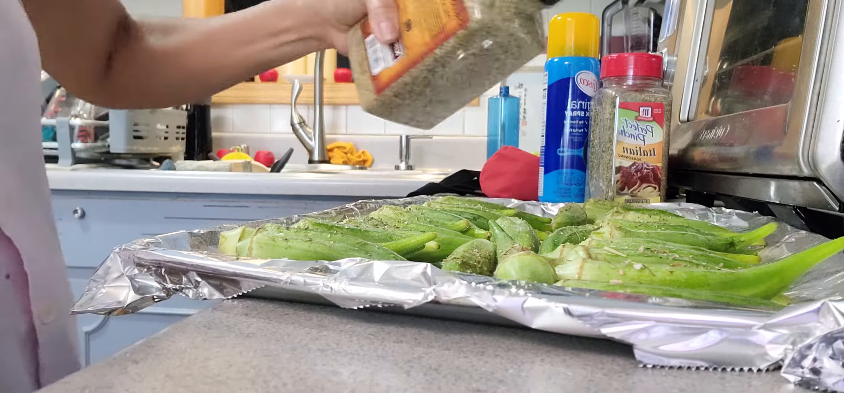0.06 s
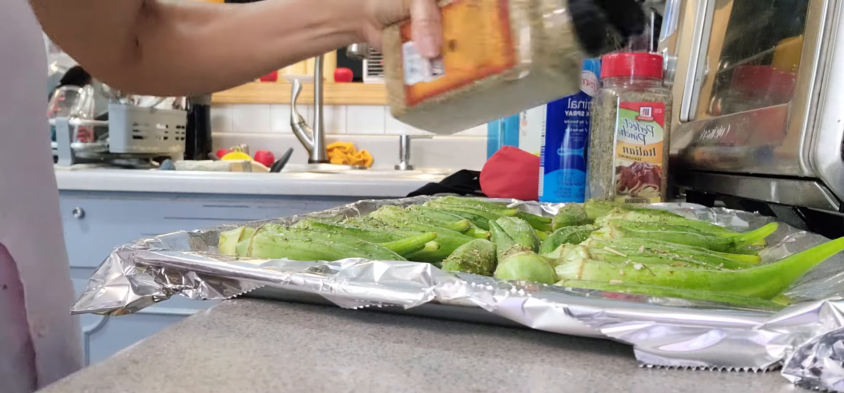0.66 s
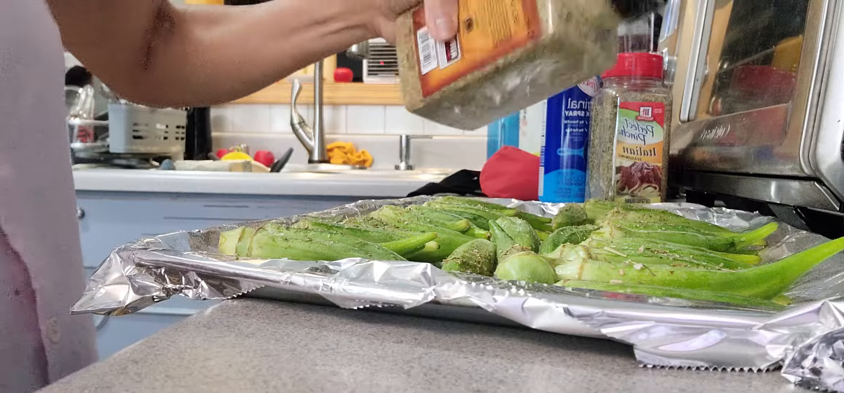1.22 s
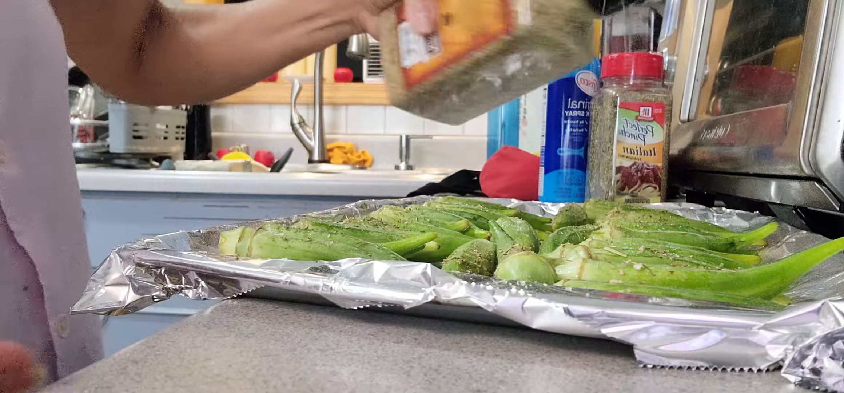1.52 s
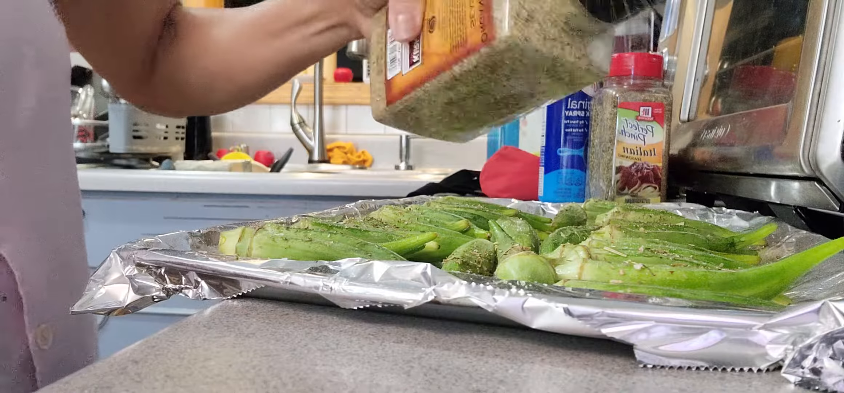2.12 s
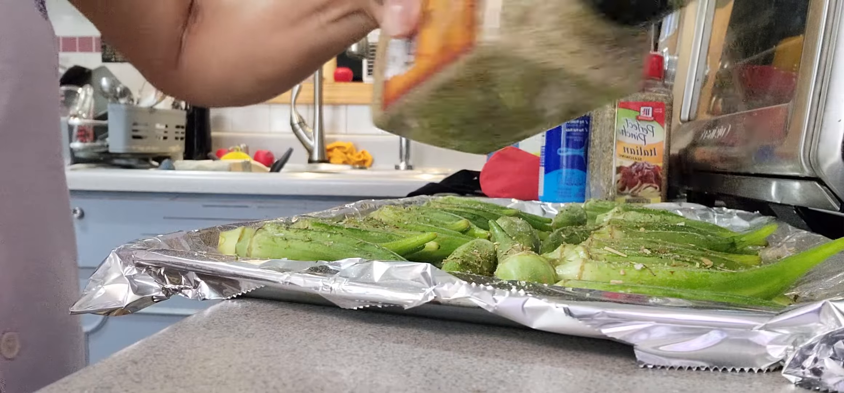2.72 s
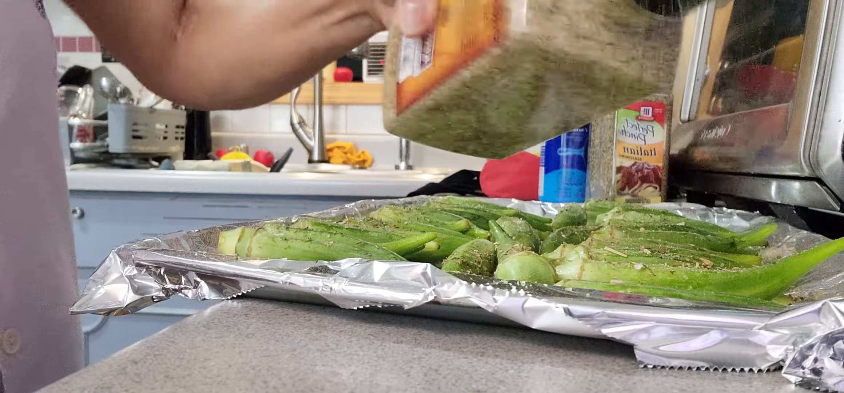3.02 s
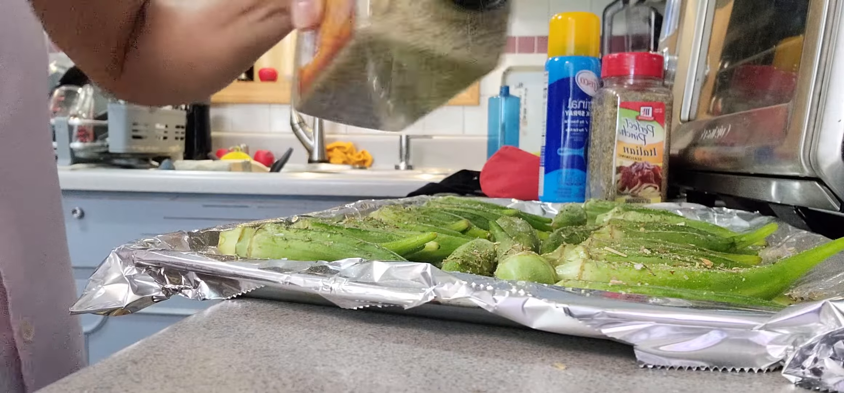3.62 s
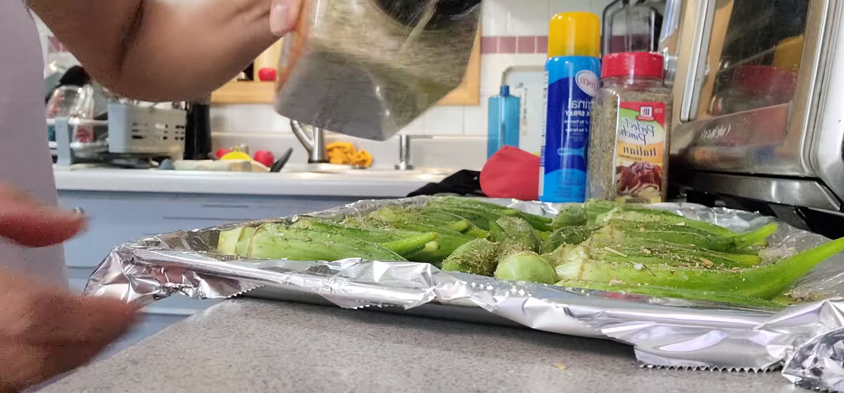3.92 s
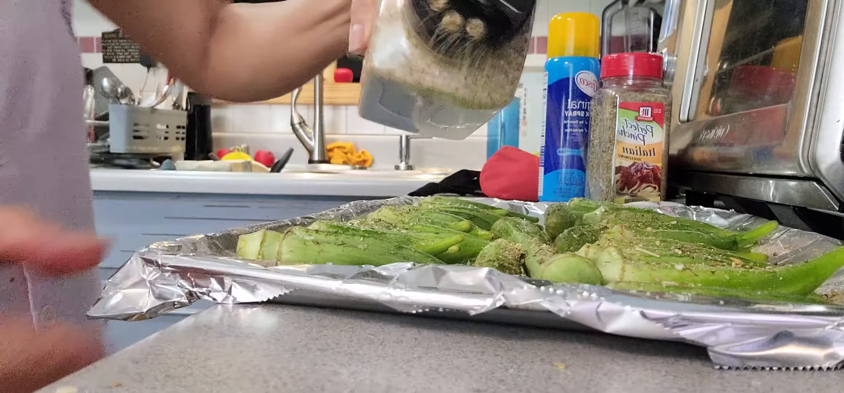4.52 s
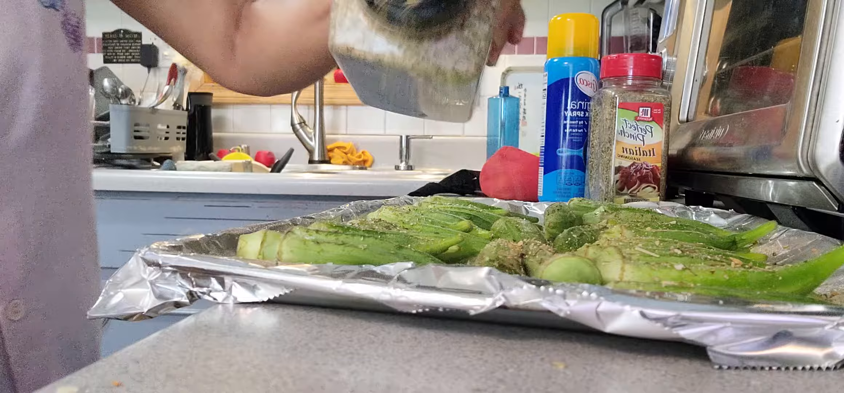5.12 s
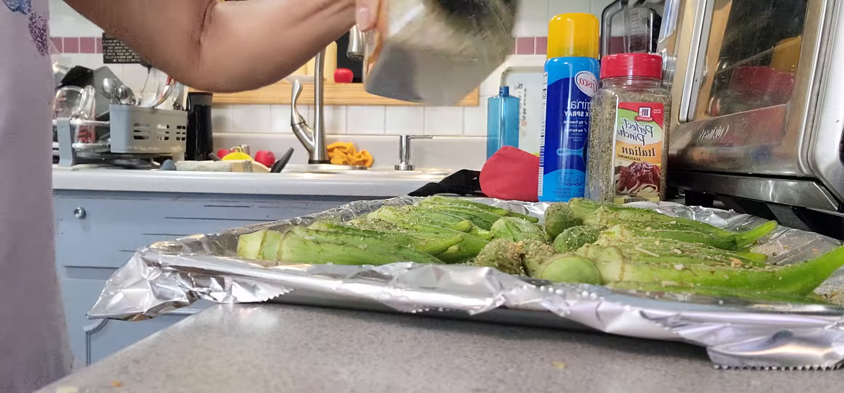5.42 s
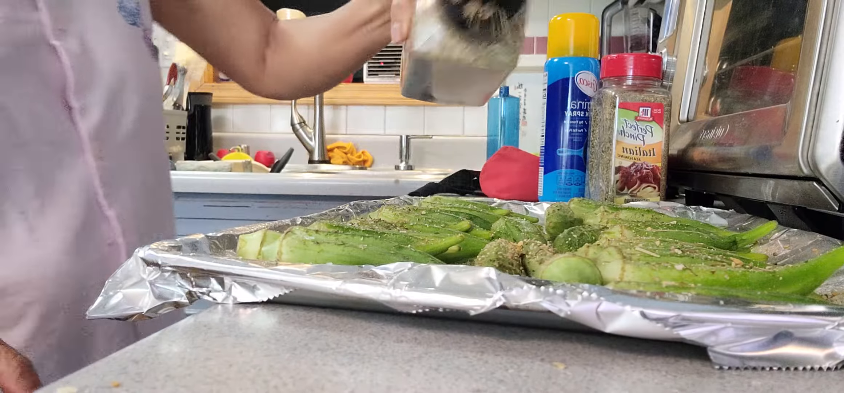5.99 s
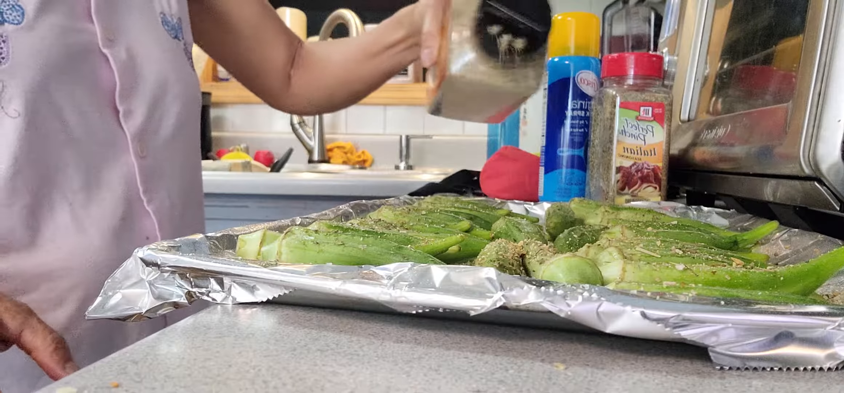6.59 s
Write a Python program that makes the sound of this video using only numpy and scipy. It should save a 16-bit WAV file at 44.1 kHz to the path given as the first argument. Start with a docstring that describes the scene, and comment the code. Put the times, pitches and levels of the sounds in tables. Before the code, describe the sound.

A faint hiss of fine dust leads into a run of dry, crisp shakes of seasoning in a plastic jar, loose grains ticking on a foil-lined tray near the microphone. Midway the shaking pauses, foil snaps and rustles, and the tray scrapes to a small knock. Then the jar rattles again, more sparsely, over the steady low hum of kitchen appliances.

```python
"""A kitchen counter, close up, heard through the two microphone ports of a camera; appliances hum behind.
Dried seasoning is shaken from a big plastic jar over vegetables on a foil-lined tray. Dust hisses out
first; each shake throws grains against the jar and its lid, while loose ones patter down on the foil.
Midway a hand grips the crackling foil and drags the tray to a knock, then the shaking resumes."""
import sys
import numpy as np
from scipy import signal
from scipy.fft import rfft, irfft
from scipy.io import wavfile
from scipy.ndimage import uniform_filter1d

SR = 44100
rng = np.random.default_rng(int(sys.argv[2]) if len(sys.argv) > 2 else 0)


def unload_wav(signal):
    """Save mono or channel-first audio to the path in sys.argv[1] as 16-bit WAV at rate SR, clipped to [-1, 1]."""
    wavfile.write(
        sys.argv[1],
        SR,
        np.round(np.clip(np.atleast_2d(signal).T, -1, 1) * 32767).astype(np.int16),
    )


N = 297675
TIME = np.arange(N) / SR


def amp(db):
    """Decibels to gain."""
    return 10 ** (np.asarray(db) / 20)


def unit(x):
    """Scales to an rms of one."""
    return x / np.sqrt(np.mean(x ** 2) + 1e-20)


def curve(points, hz):
    """Joins (freq_hz, value) points on a log-frequency axis."""
    freqs, values = np.transpose(points)
    return np.interp(np.log(hz + 1), np.log(freqs + 1), values)


def humps(rings, hz):
    """Rounded resonance peaks from rows of (pitch_hz, width_hz, height)."""
    return sum(height / (1 + (2 * (hz - pitch) / width) ** 2) for pitch, width, height in rings)


def held(start_s, stop_s, edge_s):
    """Gain that fades in, holds and fades out."""
    return np.clip(np.minimum(TIME - start_s, stop_s - TIME) / edge_s, 0, 1)


def add(mix, start_s, sound):
    """Mixes a stereo sound in."""
    part = mix[:, max(round(start_s * SR), 0):][:, :sound.shape[1]]
    part += sound[:, :part.shape[1]]


# Air resonances of the jar: pitch_hz, width_hz, share_of_body
JAR_AIR = [(1430, 170, 0.96), (1750, 430, 1.97), (2280, 290, 0.33), (3360, 570, 0.78)]

def impact(colour, rings, body_db, fizz_db, patchy_db, size=2048):
    """One tiny impact: a causal pulse, coloured a little differently at every spot."""
    hz = np.fft.rfftfreq(size, 1 / SR)
    db = curve(colour, hz) + humps(rings, hz) + body_db * humps(JAR_AIR, hz)
    db += fizz_db * curve([(7000, 0.33), (10500, 0.67)], hz)
    db += patchy_db * unit(uniform_filter1d(rng.standard_normal(len(hz)), size=32))
    log_gain = np.log(amp(np.r_[db, db[-2:0:-1]]))
    minimum_phase = np.exp(np.conj(signal.hilbert(log_gain)))
    return np.fft.ifft(minimum_phase).real[:size // 2]


def random_hits(count, per_s, spread_db):
    """Randomly timed impulses, most of them small and a few large."""
    strength = amp(spread_db * np.minimum(rng.exponential(1, count), 4))
    return strength * rng.choice([-1., 1.], count) * (rng.random(count) < per_s / SR)


def at_microphone(pulse, echo_db=-1.5, size=512):
    """A close spot as the two ports hear it, with its own lag and echoes off counter and oven door."""
    t = np.arange(size) / SR
    echoes = rng.standard_normal((2, size)) * np.exp(-t / 0.0034) * (t > .0006)
    paths = amp(echo_db) * echoes / np.linalg.norm(echoes, axis=1, keepdims=True)
    lag_s = .00013 + .00012 * rng.standard_normal()  # mostly the right port comes first
    paths[0, round(np.clip(lag_s, 0, t[-1]) * SR)] += 1
    paths[1, round(np.clip(-lag_s, 0, t[-1]) * SR)] += 1
    heard = signal.fftconvolve(pulse[None], paths, axes=1) * amp([[-1.5], [1.5]])
    return heard / np.linalg.norm(heard)


def add_burst(mix, peak_s, level_db, fall_s, pulse, snap_s, per_s, spread_db=2, echo_db=-2.5):
    """A crowd of impacts swells and thins out; the shorter it is, the more of it is one hard snap."""
    rise_s = .0006 + .13 * fall_s
    t = np.arange(-int(2 * rise_s * SR), int(5 * fall_s * SR)) / SR
    swell = np.exp(np.minimum(2 * t / rise_s, -t / fall_s))
    density = per_s * (1 + .015 / fall_s * swell)  # a short burst packs its impacts closer
    crowd = swell * random_hits(len(t), density, spread_db)
    crowd /= np.linalg.norm(crowd) + 1e-12
    snap_share = np.exp(-fall_s / snap_s)
    hits = np.sqrt(1 - snap_share) * crowd + np.sqrt(snap_share) * (t == 0)
    sound = signal.fftconvolve(hits[None], at_microphone(pulse, echo_db), axes=1)
    add(mix, peak_s - rise_s, amp(level_db) * np.linalg.norm(swell) * sound / np.linalg.norm(sound))


def stream(colour, rings, per_s, spread_db, spurt_db, patchy_db, span_s=(0, np.inf), size=1024):
    """A run of impacts that comes in spurts and lands on a new spot from moment to moment."""
    active = (TIME >= span_s[0]) & (TIME <= span_s[1])
    spurts = unit(uniform_filter1d(uniform_filter1d(rng.standard_normal(N), size=700), size=200))
    hits = active * random_hits(N, per_s, spread_db) * amp(spurt_db * np.clip(spurts, -2, 2))
    out = np.zeros((2, N))
    for start in range(0, N, size):
        if active[start:start + size].any():
            spot = at_microphone(impact(colour, rings, 0, 0, patchy_db))
            add(out, start / SR, signal.fftconvolve(hits[None, start:start + size], spot, axes=1))
    return unit(out) * np.sqrt(active.mean())


# Room tone behind the counter: freq_hz, gain_db
ROOM_COLOUR = [(20, -9), (38, -1), (52, -4), (75, 1), (115, -8), (170, -15), (250, -14), (450, -18),
               (780, -23), (1100, -32), (1600, -34), (2500, -42), (7000, -42.5), (9500, -47), (16000, -50)]
# How alike it is at the two ports: freq_hz, correlation
ROOM_LIKENESS = [(60, 1), (130, 0.75), (300, 0.76), (640, 0.52), (1400, 0), (3000, 0)]
# An appliance in the background: pitch_hz, level_db
HUM_TONES = [(242.2, -72.5), (409.1, -65.5), (543.7, -76.5)]

def kitchen_hum(room_db=-55):
    """Low rumble and fan noise with an appliance's wavering tones, a little louder on the right."""
    hz = np.fft.rfftfreq(N, 1 / SR)
    left, other = rfft(rng.standard_normal((2, N)))
    likeness = np.clip(curve(ROOM_LIKENESS, hz), -1, 1)
    right = likeness * left + np.sqrt(1 - likeness ** 2) * other
    air = unit(irfft(np.array([left, right]) * amp(curve(ROOM_COLOUR, hz)), N))
    hum = np.zeros(N)
    for pitch_hz, level_db in HUM_TONES:
        waver_hz = 1.46 * unit(uniform_filter1d(rng.standard_normal(N), size=6000))
        hum += amp(level_db) * np.sqrt(2) * np.sin(2 * np.pi * np.cumsum(pitch_hz + waver_hz) / SR)
    return (amp(room_db) * air + hum) * amp([[-1.1], [1.1]])


# Fine dust, faint even this close: freq_hz, gain_db
DUST_COLOUR = [(2500, -35), (5500, -10), (7000, 2.5), (9000, -7), (16000, -15)]

def dust_hiss(span_s=(0.312, 0.56)):
    """Fine dust hisses out as the jar tips."""
    hiss = stream(DUST_COLOUR, (), per_s=5700, spread_db=2.5, spurt_db=4.5, patchy_db=0.5, span_s=span_s)
    return amp(-62.5) * held(*span_s, edge_s=0.0056) * hiss


# Grains thrown against the jar, close to the microphone: peak_s, relative_db, fall_s, dust_fizz_db
SHAKES = [(0.5397, -36.5, .012, 0), (0.5514, -28, .035, 0), (0.5634, -29, 0.017, 4),
          (0.645, -29.5, 0.0059, -11), (0.718, -33.5, 0.015, 8), (0.7304, -28.5, 0.019, 7),
          (0.827, -40.5, 0.021, -10), (0.862, -37.5, 0.0095, -1), (0.969, -43, 0.0079, -9),
          (1.019, -46.5, 0.012, -1), (1.131, -46, .018, 9), (1.2135, -38, .007, -14),
          (1.266, -44.5, .025, 3), (1.2952, -26.5, .0064, 3), (1.4195, -36, 0.016, 2),
          (1.4838, -29, .012, 10), (1.534, -33, 0.0093, -18), (1.639, -43.5, 0.026, -6),
          (1.707, -35.5, 0.0085, 11), (1.918, -30, 0.0081, -13), (1.9732, -30.5, 0.025, 10),
          (2.0583, -30.5, .013, -9), (2.161, -21.5, .005, 11), (2.178, -32.5, 0.018, 5),
          (2.22, -37, 0.013, 6), (2.253, -32.5, 0.0088, 3), (2.3064, -38, 0.022, -2),
          (2.395, -37, 0.016, 0), (2.4153, -34, 0.0088, 1), (2.5099, -29, 0.011, 20),
          (2.5172, -20.5, 0.0098, 11), (2.6003, -20, .011, 0), (2.63, -30, .014, -8),
          (2.66, -31.5, .018, -16), (2.6885, -21, 0.013, -6), (2.829, -30, 0.0045, -3),
          (2.863, -27, .022, -2), (2.992, -25, .0076, -2), (3.013, -27, 0.0067, 7), (3.044, -31, 0.021, 4),
          (3.058, -27.5, 0.0045, -4), (3.0809, -25, 0.013, 8), (3.111, -21.5, 0.0067, 12),
          (3.1219, -20, 0.0026, 14.5), (3.2377, -21, 0.004, 4), (5.096, -27.5, 0.014, -1),
          (5.11, -24, 0.0058, -10), (5.167, -36, 0.0071, 2), (5.2439, -33, 0.0082, -8),
          (5.2644, -32, 0.0056, -2), (5.4547, -43.5, 0.0049, 33), (5.61, -45, 0.025, 24),
          (5.8261, -41, 0.012, 15), (6.225, -34.5, 0.007, -9), (6.2606, -35, 0.016, -6),
          (6.317, -37, 0.042, -7), (6.4057, -29.5, 0.032, 5), (6.662, -36.5, 0.013, -12),
          (6.6976, -34, 0.02, -7), (6.7173, -28.5, 0.0055, -10)]
# A grain's strike: freq_hz, gain_db
STRIKE_COLOUR = [(200, -29), (600, -28), (880, -21.5), (1150, -27.5), (1900, -17), (2600, -9), (4000, -1),
                 (5500, 0.5), (6900, 0), (8200, -6), (9700, -12.5), (11500, -7.5), (16000, -15)]
# Resonances of the plastic jar, and of its mouth: pitch_hz, width_hz, height_db
JAR_RINGS = [(2060, 83, -1.5), (3930, 160, -2.5), (6990, 250, 4), (8520, 150, 4), (9020, 47, 9.5)]
MOUTH_RING = [(3250, 750, 6.8)]
# The jar's hollow body, strongest when the whole heap slides: time_s, body_db
HOLLOWNESS = [(0.54, 9), (0.6, 12), (0.85, 7.5), (0.98, 18.5), (1.15, 1), (1.6, 7.5), (2.15, -3), (2.7, 2),
              (5.2, 0), (6.3, -3), (6.72, 5)]

def jar_shakes(turn_s=6.15):
    """Seasoning strikes the jar; after turn_s its mouth faces the microphone and rings through."""
    out = np.zeros((2, N))
    for peak_s, level_db, fall_s, fizz_db in SHAKES:
        body_db = np.interp(peak_s, *np.transpose(HOLLOWNESS))
        rings = JAR_RINGS + MOUTH_RING if peak_s > turn_s else JAR_RINGS
        pulse = impact(STRIKE_COLOUR, rings, body_db, fizz_db, patchy_db=1.7)
        add_burst(out, peak_s, level_db, fall_s, pulse, snap_s=0.0021, per_s=1500)
    return amp(3.5) * out


# Steady flow with the tilt of the jar: time_s, relative_db
POUR = [(0, -89), (0.28, -76.5), (0.53, -77), (0.6, -57), (1.1, -60.5), (2.4, -55), (2.68, -47),
        (2.95, -58.5), (3.3, -60), (3.55, -61.5), (3.76, -65), (4.6, -59), (5.2, -58), (5.45, -62),
        (6.1, -59), (6.75, -55)]

def grain_flow(pour_db, stirred_db, delay_s, lead_s=0.0045, settle_s=0.034):
    """Gain of the loose grains: the pour, plus a heap that slides just before each shake and settles."""
    kicks = np.zeros(N)
    for peak_s, level_db, fall_s, _ in SHAKES:
        kicks[min(round((peak_s + delay_s) * SR), N - 1)] += amp(level_db) ** 2 * fall_s / 2
    after = signal.lfilter([1 / settle_s], [1, -np.exp(-1 / (settle_s * SR))], kicks)
    before = signal.lfilter([1 / lead_s], [1, -np.exp(-1 / (lead_s * SR))], kicks[::-1])[::-1]
    pour = amp(np.interp(TIME, *np.transpose(POUR)) + pour_db)
    return np.sqrt(pour ** 2 + amp(stirred_db) ** 2 * (after + 0.53 * before))


def jar_slide():
    """Loose seasoning keeps sliding along the plastic between shakes."""
    sliding = stream(STRIKE_COLOUR, JAR_RINGS, per_s=900, spread_db=3, spurt_db=4.5, patchy_db=3)
    return amp(2.5) * grain_flow(pour_db=0, stirred_db=-13, delay_s=0) * sliding


# Fine grains landing on the tray nearby: freq_hz, gain_db
PATTER_COLOUR = [(500, -44), (1500, -4.5), (3000, 1), (6500, -7.5), (9500, -0.5), (12000, 2), (16000, 0)]

def grain_patter():
    """Fine grains drop on foil and vegetables, loudest just after each shake."""
    landing = stream(PATTER_COLOUR, (), per_s=1200, spread_db=3, spurt_db=6.5, patchy_db=0.5)
    return amp(3) * grain_flow(pour_db=-1.5, stirred_db=-25, delay_s=0.01) * landing


# Coarse grains landing nearby: peak_s, relative_db
TICKS = [(1.8754, -30.5), (2.7819, -14.5), (3.859, -33.5), (4.6565, -33), (5.0477, -32), (5.7069, -31.5),
         (5.874, -22.5), (5.9783, -28.5), (6.0604, -34.5), (6.339, -26)]
# The foil under a grain: pitch_hz, width_hz, height_db
TICK_RING = [(5800, 710, 10)]

def coarse_ticks():
    """Coarse grains tick singly and make the foil ring."""
    out = np.zeros((2, N))
    for peak_s, level_db in TICKS:
        pulse = impact(STRIKE_COLOUR, TICK_RING, body_db=-0.5, fizz_db=-2, patchy_db=2.4)
        add_burst(out, peak_s, level_db, fall_s=0.0035, pulse=pulse, snap_s=0.0022, per_s=2000)
    return amp(-1) * out


# Creases snapping under the hand, close up: peak_s, relative_db, pitch_hz, fall_s
FOIL_SNAPS = [(3.979, -24.5, 5730, 0.0032), (4.032, -33, 5330, 0.0026), (4.0733, -16, 5400, 0.003),
              (4.146, -26, 4900, 0.003), (4.1889, -21, 3300, 0.0031), (4.2173, -23, 5630, 0.0026),
              (4.3595, -21, 3430, 0.0027), (4.3852, -17.5, 5070, 0.003), (4.4128, -9, 4200, 0.003),
              (4.4609, -6.5, 5130, 0.003), (4.4654, -7.5, 7240, 0.003)]
# Crumpling foil: freq_hz, gain_db
FOIL_COLOUR = [(200, -25), (400, -14.5), (800, -18.5), (1500, -19), (2500, -3.5), (4300, 0.5), (7000, 1.5),
               (9700, -14.5), (12000, -14.5), (16000, -19)]

def foil_crackle(grip_s=(3.975, 4.5)):
    """The foil rim rustles in the hand, and each crease that snaps rings at its own pitch."""
    snaps = np.zeros((2, N))
    for peak_s, level_db, pitch_hz, fall_s in FOIL_SNAPS:
        fizz_db = 8.5 + 1.3 * (level_db + 14.5)  # harder snaps are brighter
        ring = [(pitch_hz, 1000, 11)]  # pitch_hz, width_hz, height_db
        pulse = impact(FOIL_COLOUR, ring, body_db=-3.5, fizz_db=fizz_db, patchy_db=2.6)
        add_burst(snaps, peak_s, level_db, fall_s, pulse,
                  snap_s=0.0046, per_s=4000, spread_db=1, echo_db=-5.5)
    rustle = stream(FOIL_COLOUR, (), per_s=1000, spread_db=2.5, spurt_db=5, patchy_db=3, span_s=grip_s)
    return amp(-1.2) * snaps + amp(-44.5) * held(*grip_s, edge_s=0.012) * rustle


# Tray on counter, close up: freq_hz, gain_db
SCRAPE_COLOUR = [(100, -32), (350, -8), (550, -16.5), (720, -7.5), (950, -14), (1250, -18), (1750, 2.5),
                 (2200, 0), (3500, -1.5), (6500, 2.5), (8000, -7), (9700, -15.5), (16000, -16)]
# Resonances of the dragged tray: pitch_hz, width_hz, height_db
TRAY_RINGS = [(1479, 120, 3.8), (1880, 120, 5), (3250, 230, 8.2), (4000, 150, 4.6)]

def tray_drag(pull_s=(4.17, 4.47), fastest_s=4.32, rise_db_per_s=140, fall_db_per_s=73):
    """The tray grates over the counter in one pull, louder with speed."""
    pull_db = -29 - np.maximum(rise_db_per_s * (fastest_s - TIME), fall_db_per_s * (TIME - fastest_s))
    grating = stream(SCRAPE_COLOUR, TRAY_RINGS,
                     per_s=2800, spread_db=3, spurt_db=-0.5, patchy_db=1, span_s=pull_s)
    return held(*pull_s, edge_s=0.08) * amp(pull_db) * grating


# Modes of the knocked tray, alike at both ports: pitch_hz, relative_db, t60_s
KNOCK_MODES = [(353, 3.5, 0.059), (834, -2, 0.067), (1077, -2.5, 0.065)]

def tray_knock(start_s=4.464):
    """The tray knocks as it stops and rings briefly."""
    t = np.maximum(TIME - start_s, 0)
    modes = [amp(db - 60 * t / t60_s) * np.sin(2 * np.pi * hz * t) for hz, db, t60_s in KNOCK_MODES]
    return amp(-48) * sum(modes)


def wall_echoes(near, delay_s=0.006, t60_s=0.21, wet_db=-8.5, per_s=4000, size=16384):
    """Sparse reflections off the kitchen walls, different at each port, the treble dying first."""
    taps = rng.choice([-1., 1.], (2, size)) * (rng.random((2, size)) < per_s / SR)
    hz, t, spectra = signal.stft(taps, SR, nperseg=128)
    band_t60_s = t60_s * curve([(1000, 1), (6000, 0.46), (16000, 0.24)], hz)[:, None]
    tail = signal.istft(spectra * amp(-60 * t / band_t60_s), SR, nperseg=128)[1]
    tail /= np.linalg.norm(tail, axis=1, keepdims=True)
    tail = np.pad(tail, ((0, 0), (int(delay_s * SR), 0)))
    return amp(wet_db) * signal.oaconvolve(near, tail, axes=1)[:, :N]


def scene():
    """Jar and tray close to the microphone, the walls answering faintly, room tone behind."""
    seasoning = jar_shakes() + jar_slide() + dust_hiss() + grain_patter() + coarse_ticks()
    near = seasoning + foil_crackle() + tray_drag() + tray_knock()
    return near + wall_echoes(near) + kitchen_hum()


# Lift of the left microphone port: freq_hz, gain_db
LEFT_PORT = [(600, 0), (2000, 3), (4200, 0)]

def record(dry):
    """The camera's left port favours the upper middle, and both channels roll off at 16.1 kHz."""
    hz = np.fft.rfftfreq(N, 1 / SR)
    left = irfft(rfft(dry[0]) * amp(curve(LEFT_PORT, hz)), N)
    low_pass = signal.firwin(401, 16100, window=("kaiser", 8), fs=SR)
    return signal.oaconvolve(np.array([left, dry[1]]), low_pass[None], "same")


dry = scene()
out = record(dry)
unload_wav(out)
```